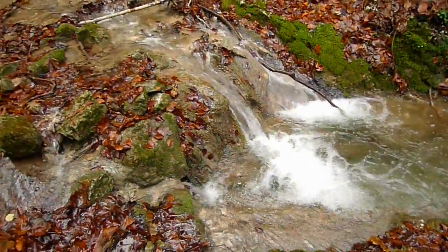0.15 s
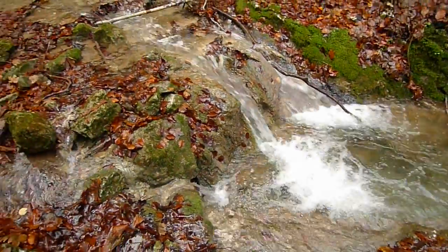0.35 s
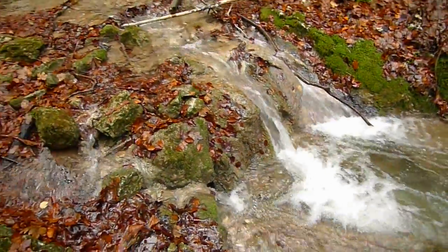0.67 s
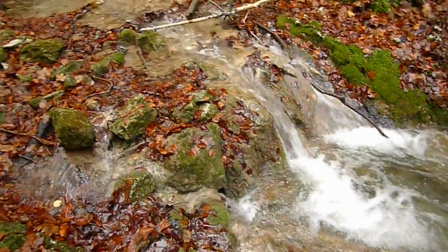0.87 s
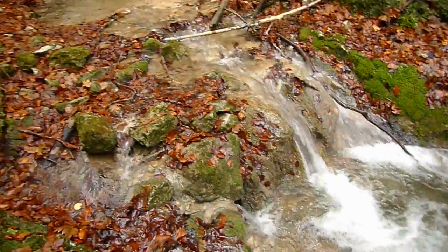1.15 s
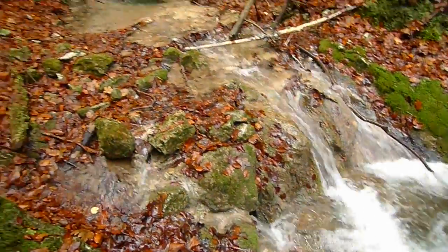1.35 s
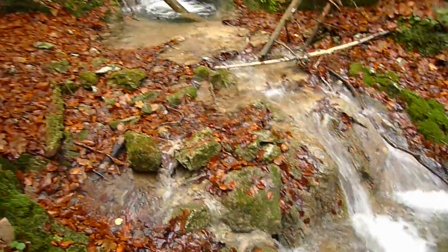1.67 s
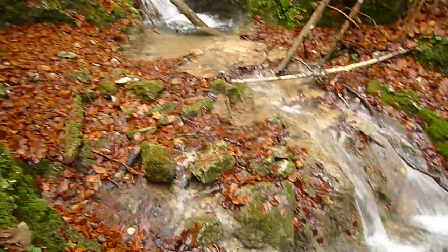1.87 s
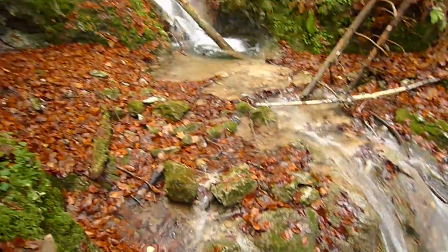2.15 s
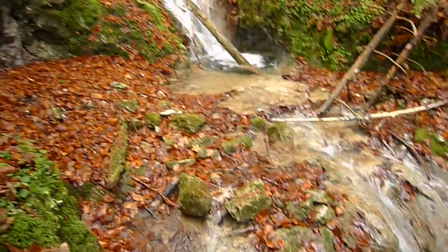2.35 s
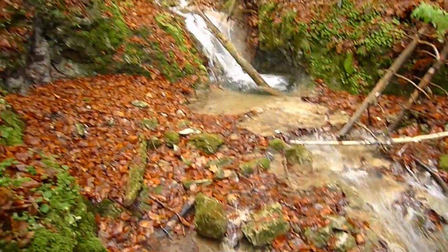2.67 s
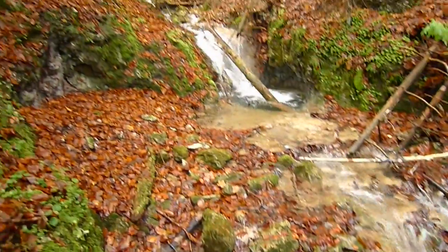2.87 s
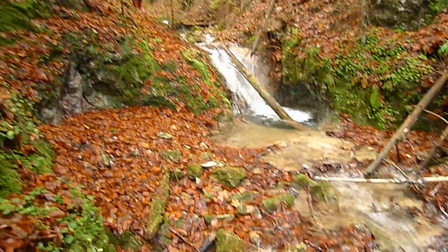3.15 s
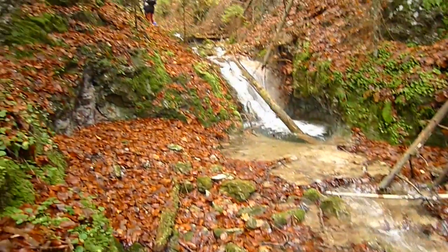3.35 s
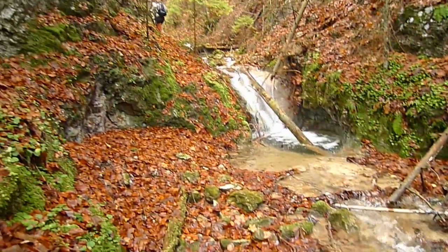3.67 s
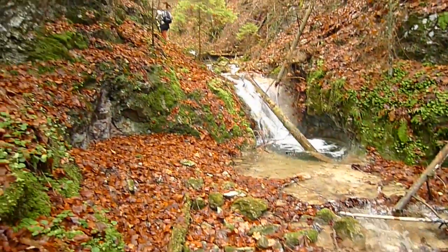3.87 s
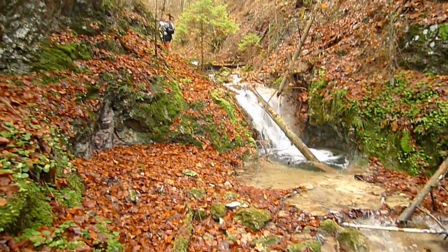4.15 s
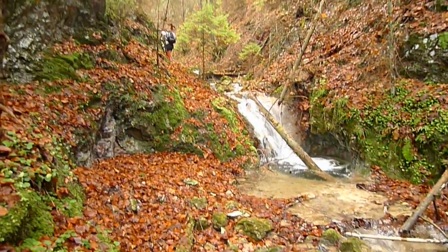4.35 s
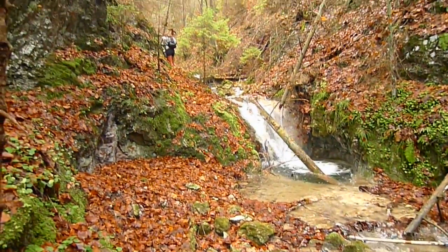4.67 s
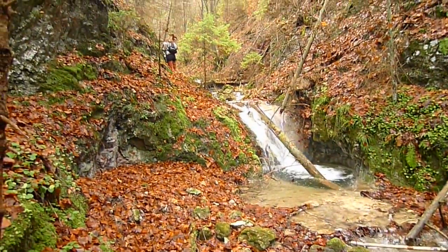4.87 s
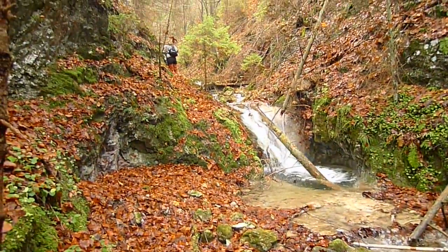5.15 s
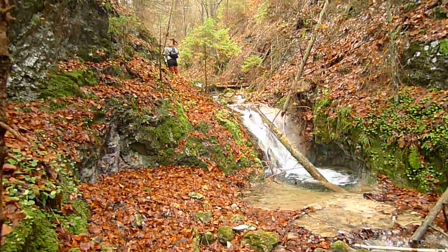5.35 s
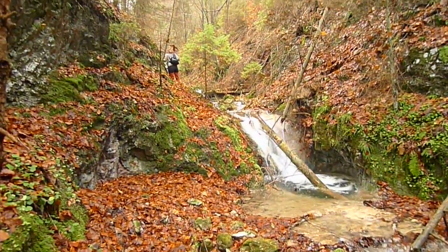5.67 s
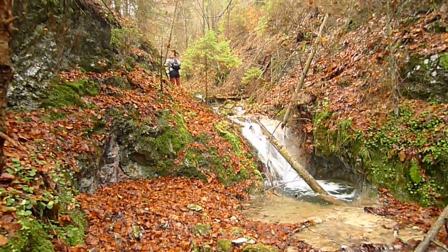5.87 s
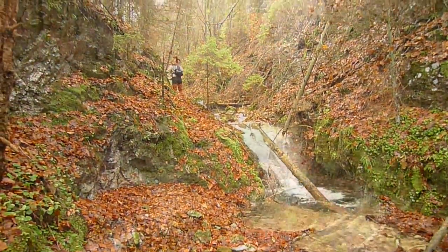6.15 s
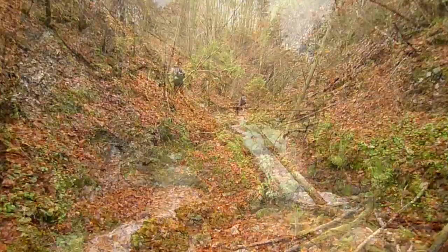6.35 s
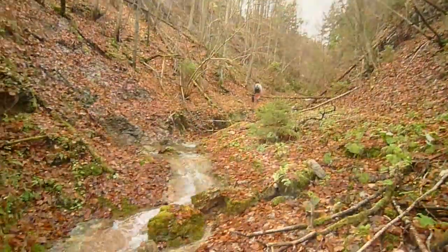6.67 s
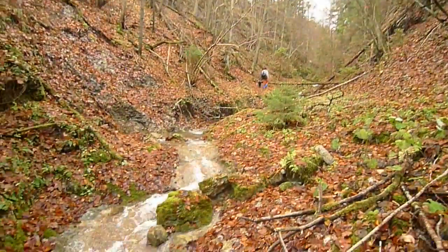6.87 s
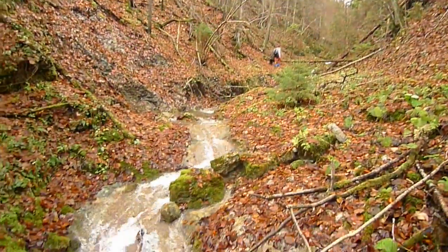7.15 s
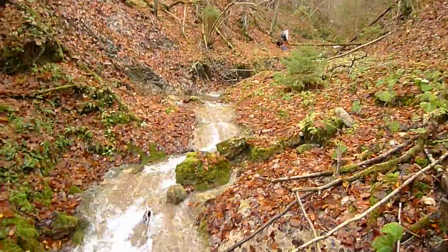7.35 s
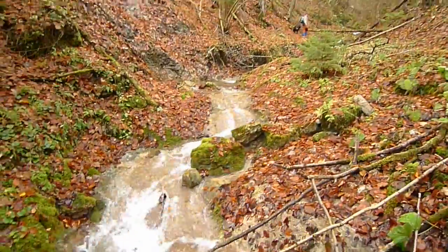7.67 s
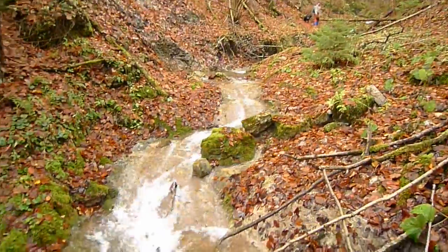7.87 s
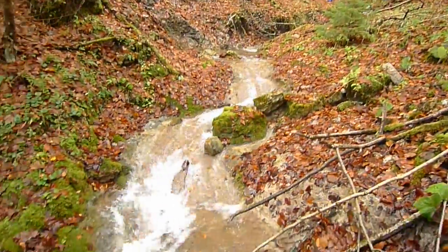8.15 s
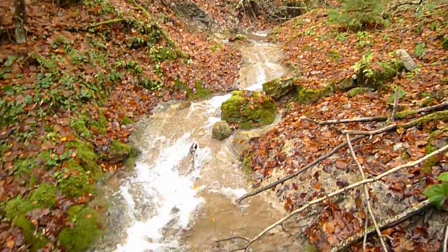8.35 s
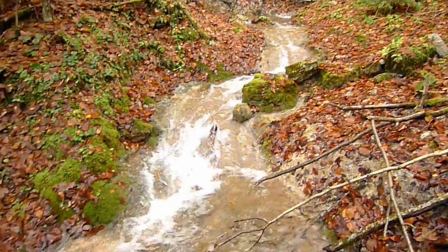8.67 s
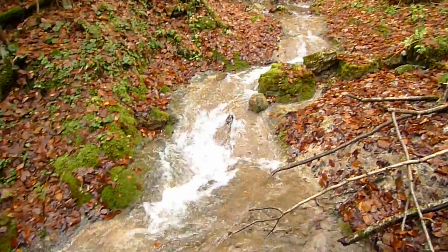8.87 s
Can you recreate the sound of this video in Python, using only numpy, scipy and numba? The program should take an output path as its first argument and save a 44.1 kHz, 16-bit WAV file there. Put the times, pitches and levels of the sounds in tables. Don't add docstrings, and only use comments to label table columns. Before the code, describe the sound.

From 0 seconds a small forest cascade rushes close to a mono pocket-camera microphone: a dense, steady wash made of thousands of tiny rising bubbles, strongest in low mids and mids, with little treble beyond faint hiss and an almost inaudible thin whine. Hollow gulps around 400 Hz surge roughly three times a second, with occasional brighter plinks. A soft low air puff brushes the microphone near 0.5. From 1 to 4 the water's colour slides towards a fall upstream, with brief automatic dips in level, notably near 1.3 and 2. The fall continues evenly to 5.9, where a hard tick brings in a second stream. Both sound together, fuller and louder, with a strong gulp near 6.3. At 6.9 another tick cuts away the first; wider, looser rapids over stones run on, swelling gently near 7.7 and 8.6, and end at about 9 still flowing.

```python
import sys
import numpy as np
from scipy import signal
from scipy.fft import rfft, irfft, next_fast_len
from scipy.io import wavfile
from scipy.ndimage import uniform_filter1d
from numba import njit

SR = 44100
rng = np.random.default_rng(int(sys.argv[2]) if len(sys.argv) > 2 else 0)


def put_to_file(sound):
    columns = np.atleast_2d(sound).T
    safe = np.clip(columns, -1, 1)
    whole_steps = np.round(safe * 32767)
    wavfile.write(sys.argv[1], SR, whole_steps.astype(np.int16))


def amplitude_ratio(level_db):
    exponent = np.asarray(level_db, float) / 20
    return 10 ** exponent


N = 397782

CUT_IN_S, CUT_OUT_S, FRAME_S = 5.9323, 6.8923, 0.04

# frequency in Hz, density in dB per Hz.
CASCADE_COLOUR = [(15, -67.5), (25, -40), (86, -18), (130, -20), (252, -9.5), (286, -8.5), (370, -2),
                  (488, -11), (520, -14.5), (673, -12), (1420, -13.5), (1720, -14), (2180, -22.5),
                  (2940, -16.5), (4140, -42.5), (5380, -66.5), (9110, -120)]
BETWEEN_COLOUR = [(15, -64.5), (25, -37), (90, -20.5), (124, -17.5), (339, -4), (499, -7.5), (555, -19.5),
                  (618, -12), (798, -9.5), (1170, -9), (1420, -13), (2130, -11), (2940, -18.5),
                  (4140, -39.5), (5380, -66), (9110, -120)]
FALL_COLOUR = [(15, -71), (25, -44), (64, -26), (161, -15), (199, -12), (403, 1.5), (488, -2.5), (658, -15),
               (888, -12), (1050, -14), (1360, -10.5), (1800, -17), (2430, -12.5), (3200, -22), (4140, -45),
               (5380, -94), (9110, -120)]
RAPIDS_COLOUR = [(15, -67), (25, -56.5), (32, -37), (79, -27.5), (98, -21.5), (141, -11.5), (318, -9),
                 (354, -5.5), (386, -6), (509, -6.5), (967, -11), (1420, -8), (2280, -13), (3000, -17.5),
                 (4140, -39.5), (5380, -77.5), (9110, -120)]
# frequency in Hz, density in dB per Hz.
HISS_COLOUR = [(3000, -20), (3900, 8), (4400, 10.5), (4900, 8), (5400, 2.5), (6800, 0.5), (7600, -2.5),
               (8400, -8), (9200, -17.5), (10000, -32)]
# time in seconds, view (0 cascade, 1 between, 2 fall).
TURN = [
    (0, 0.036),
    (1.2, 0.38),
    (2.1, 1.01),
    (3.2, 1.5),
    (4, 1.99),
]
# time in seconds, level in dB.
DRAUGHT = [
    (0.0, -56),
    (0.228, -51),
    (0.29, -68),
    (0.468, -34),
    (0.67, -54),
    (0.768, -52),
    (0.98, -58),
    (1.1, -54),
]
# pitch in Hz, level in dB rms.
WHINE = [
    (4388, -76),
    (6222.5, -87),
    (6666, -89),
]
# time in seconds, depth in dB.
GAIN_DUCKS = [(.05, 3), (.255, 1), (1.275, 6), (1.965, 4), (2.67, 2.5), (3.52, 3.5), (4.255, 4.5),
              (7.232, 4), (8.04, 2.5)]
# time in seconds, wash level in dB.
FIRST_FLOW = [(0, -22.5), (.55, -23.5), (1.15, -22.5), (1.6, -23), (2.6, -22.5), (2.92, -23.8),
              (3.15, -22.8), (3.88, -24.5), (4.15, -23.5), (4.75, -24), (5.5, -23.5), (5.82, -25.5),
              (5.94, -23.5)]
RAPIDS_FLOW = [(6.88, -24), (7.0, -24), (7.7, -22), (8.2, -23), (8.6, -21.5), (8.75, -23.5), (9.02, -21.5)]
# time in seconds, swell in dB.
SURGES = [(.1, 2), (.42, 0), (.82, 1), (1.25, 4), (1.62, 3), (1.9, 5.5), (2.26, 1.5), (2.65, 1.5),
          (3.03, 1.5), (3.33, 2), (3.73, 3.5), (4.15, 3), (4.53, 3), (4.83, 2), (5.23, 4.5), (5.55, 2),
          (5.94, 2), (6.24, 2), (6.42, 1.5), (6.7, 3), (6.89, 2), (7.2, 3.5), (7.8, 2), (8.01, 2),
          (8.58, 2.5), (8.83, 1.5)]
# time in seconds, pitch in Hz, peak in dB.
AIR_POCKETS = [(0.042, 431, -13.5), (0.479, 402, -21.5), (0.919, 385, -19), (1.235, 398, -17),
               (1.751, 388, -16.5), (2.262, 478, -18), (2.57, 370, -17), (2.666, 450, -17), (2.958, 369, -20),
               (3.3, 470, -11.5), (3.759, 475, -16), (4.213, 436, -16), (4.577, 412, -17), (4.762, 468, -14.5),
               (4.866, 478, -18), (5.019, 380, -15), (5.592, 475, -15.5), (5.983, 408, -20), (6.029, 540, -15),
               (6.069, 473, -14), (6.109, 392, -18), (6.233, 423, -14), (6.293, 395, -8), (6.445, 409, -18),
               (6.633, 400, -21), (7.228, 430, -18.6), (7.967, 368, -19),
               (0.232, 810, -16), (1.494, 1660, -19.5), (1.768, 700, -19), (1.961, 903, -17), (3.51, 1453, -19),
          (4.764, 2390, -17), (4.789, 2130, -18), (5.956, 600, -17), (5.996, 1720, -19), (6.388, 2210, -16),
          (6.737, 920, -15.5), (6.792, 772, -20.3), (7.673, 920, -24), (8.498, 1570, -18),
          (8.688, 1650, -21)]


def curve(rows):
    times, values = np.transpose(rows)
    return np.interp(np.arange(N) / SR, times, values)


def shape(x, gain_of_hz):
    size = next_fast_len(N)
    hz = np.maximum(np.fft.rfftfreq(size, 1 / SR), 1)
    return irfft(rfft(x, size) * gain_of_hz(hz), size)[:N]


def colour(x, table):
    hz, db = np.transpose(table)
    return shape(x, lambda f: amplitude_ratio(np.interp(np.log(f), np.log(hz), db, left=-120, right=-120)))


def band(x, lo_hz, hi_hz):
    return shape(x, lambda f: 1 / (1 + (lo_hz / f) ** 8) / (1 + (f / hi_hz) ** 12))


def rms(x):
    return np.sqrt(np.mean(x ** 2))


def wash_rms(x):
    return rms(band(x, 600, 3500))


@njit
def ring(length, start, step, decay, glide, size):
    out = np.zeros(length)
    for k in range(len(start)):
        z = size[k] + 0j
        spin = decay[k] * np.exp(1j * step[k])
        climb = np.exp(1j * glide[k])
        end = min(length, start[k] + int(-5 / np.log(decay[k])))
        for i in range(start[k], end):
            out[i] += z.imag
            z *= spin
            spin *= climb
    return out


def water(cycles, rise, scatter_db, bubble_db, count):
    when, pitch, luck = rng.random((count, 3)).T
    step = 2 * np.pi * (100 + 4300 * pitch) / SR
    life = 2 * np.pi * cycles / step
    size = amplitude_ratio(-scatter_db * np.log(1 - 0.998 * luck)) / np.sqrt(life)
    start = (when * N).astype(np.int64)
    bubbles = ring(N, start, step, np.exp(-1 / life), rise * step / life, size)
    blur = rng.standard_normal(N)
    return amplitude_ratio(bubble_db) * bubbles / rms(bubbles) + blur


def surge(x, flow, pool_hz, pool_db):
    surge_s, wash_share = 0.066, 0.18
    t = np.arange(N) / SR
    swell_db = sum(db * np.exp(-((t - s) / surge_s) ** 2) for s, db in SURGES)
    pool = band(x, *pool_hz)
    wash = (x - pool) / wash_rms(x)
    moving_wash = wash * amplitude_ratio(curve(flow) + wash_share * swell_db)
    return moving_wash + pool / rms(pool) * amplitude_ratio(pool_db + swell_db)


def draught():
    air = band(rng.standard_normal(N), 22, 110)
    return air / rms(air) * amplitude_ratio(curve(DRAUGHT + [(1.3, -71)]) - 1.5)


def cascade_to_fall():
    raw = water(cycles=3.4, rise=0.12, scatter_db=1.87, bubble_db=-6.5, count=30000)
    turn = curve(TURN)
    mix = np.zeros(N)
    for k, table in enumerate((CASCADE_COLOUR, BETWEEN_COLOUR, FALL_COLOUR)):
        view = colour(raw, table)
        mix += np.clip(1 - abs(turn - k), 0, 1) * view / wash_rms(view)
    pool_db = np.interp(turn, range(3), (-26.5, -23.5, -29))
    return surge(mix, FIRST_FLOW, pool_hz=(240, 540), pool_db=pool_db) + draught()


def spatter(rate, depth_db):
    k = int(SR / rate)
    held = np.repeat(rng.standard_normal(N // k + 1), k)[:N]
    smooth = uniform_filter1d(uniform_filter1d(held, k), k // 2)
    return amplitude_ratio(depth_db * smooth)


def gain_control(attack_s=0.0045, release_s=0.042):
    t, dip_db = np.arange(N) / SR, np.zeros(N)
    for s, depth_db in GAIN_DUCKS:
        since = np.maximum(t - s, 0)
        drop = 1 - np.exp(-(since / attack_s) ** 2)
        dip_db += depth_db * drop * np.exp(-since / release_s)
    return amplitude_ratio(-dip_db)


def converter(x):
    hiss_db, offset = -62.5, -0.0042
    t = np.arange(N) / SR
    hiss = colour(rng.standard_normal(N), HISS_COLOUR)
    whine = sum(amplitude_ratio(db) * np.sin(2 * np.pi * hz * t) for hz, db in WHINE)
    return x + hiss / rms(hiss) * amplitude_ratio(hiss_db) + whine + offset


def glugs(swell_s=0.028, rise=0.06, trim_db=-1.5):
    half = int(swell_s * SR / 2)
    out, t = np.zeros(N + 2 * half), np.arange(-half, half) / SR
    pockets = AIR_POCKETS
    for (s, hz, db), phase in zip(pockets, rng.random(len(pockets))):
        wave = np.sin(2 * np.pi * (hz * (t + rise * t ** 2 / swell_s) + phase))
        i = int(s * SR)
        out[i:i + 2 * half] += amplitude_ratio(db + trim_db) * np.hanning(2 * half) * wave
    return out[half:N + half]


def rapids():
    raw = water(cycles=3.5, rise=0.14, scatter_db=1.8, bubble_db=-7.5, count=30000)
    return surge(colour(raw, RAPIDS_COLOUR), RAPIDS_FLOW, pool_hz=(140, 800), pool_db=-25)


def overlap(first, second, lean=0.9):
    t = np.arange(N) / SR
    progress = np.floor((t - CUT_IN_S) / FRAME_S) * FRAME_S / (CUT_OUT_S - CUT_IN_S)
    tilt = lean * (0.5 - progress)
    both = (t >= CUT_IN_S) & (t < CUT_OUT_S)
    out = np.where(t < CUT_IN_S, first, second)
    out[both] = (first * (1 + tilt) + second * (1 - tilt))[both]
    for cut_s, jump in ((CUT_IN_S, 0.095), (CUT_OUT_S, 0.1)):
        i = int(np.ceil(cut_s * SR))
        natural = out[i] - 2 * out[i - 1] + out[i - 2]
        out[i:i + 400] += (jump - natural) * np.exp(-np.arange(400) / 8)
    return out


def scene():
    gain = gain_control()
    first = converter(cascade_to_fall() * spatter(rate=24, depth_db=0.5) * gain)
    second = converter(rapids() * spatter(rate=24, depth_db=0.5) * gain)
    return (overlap(first, second) + glugs())[None]


def low_pass(x):
    return signal.sosfilt(signal.butter(12, 15830, fs=SR, output="sos"), x)


def record(dry):
    mix = dry + amplitude_ratio(-101) * rng.standard_normal(dry.shape)
    return low_pass(mix)


dry = scene()
out = record(dry)
put_to_file(out)
```